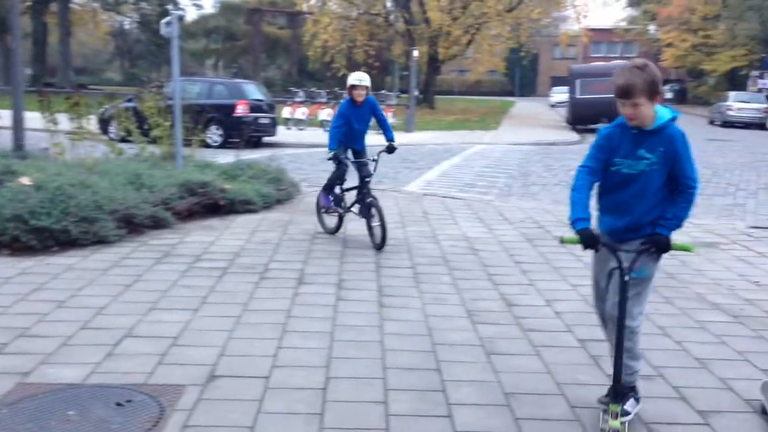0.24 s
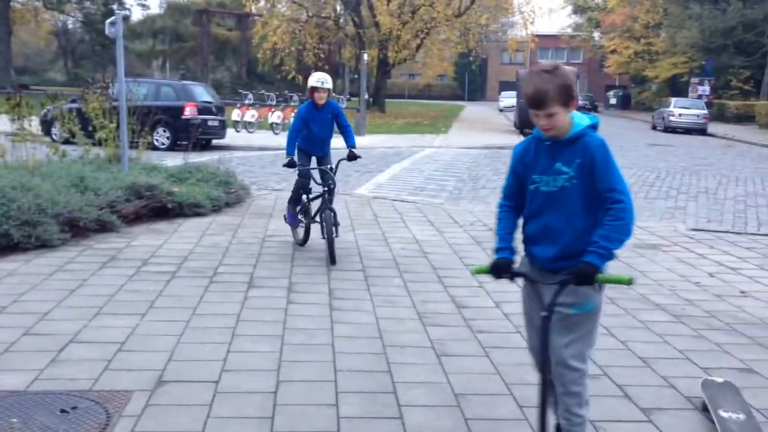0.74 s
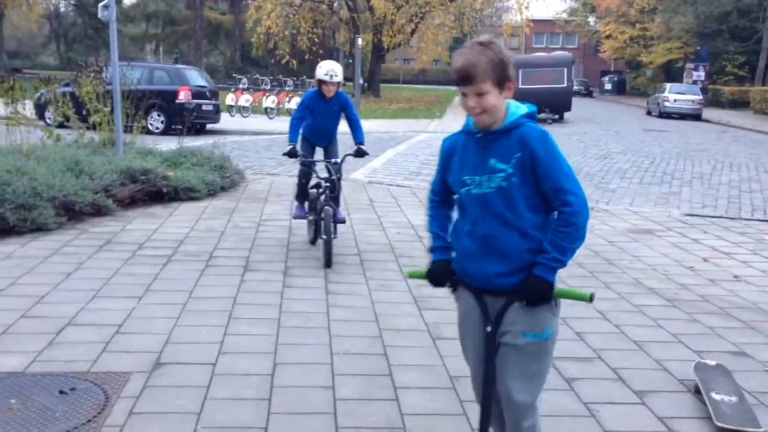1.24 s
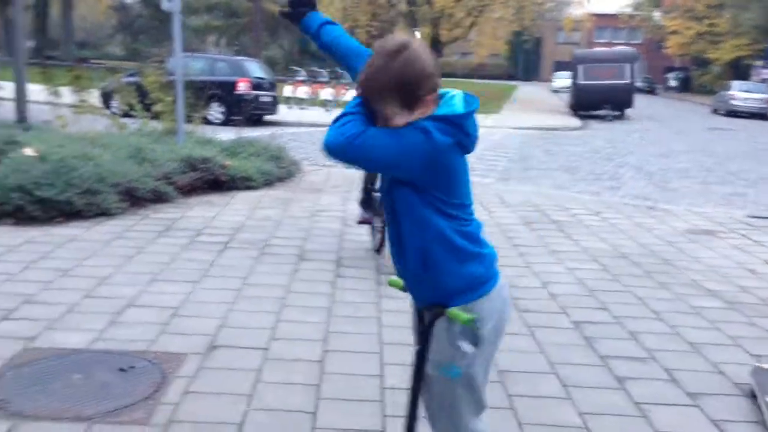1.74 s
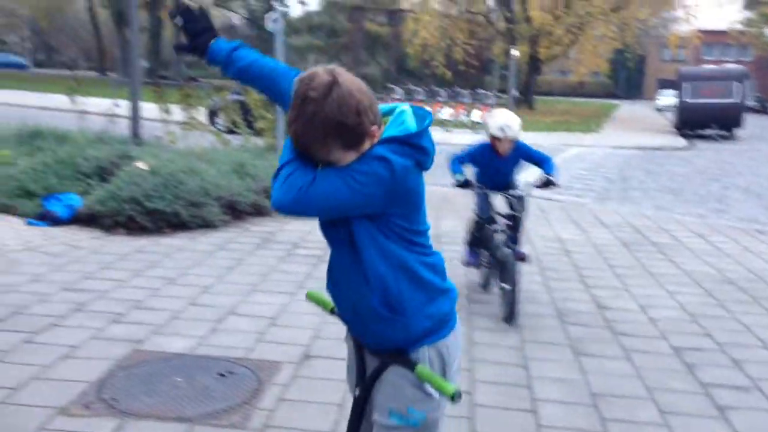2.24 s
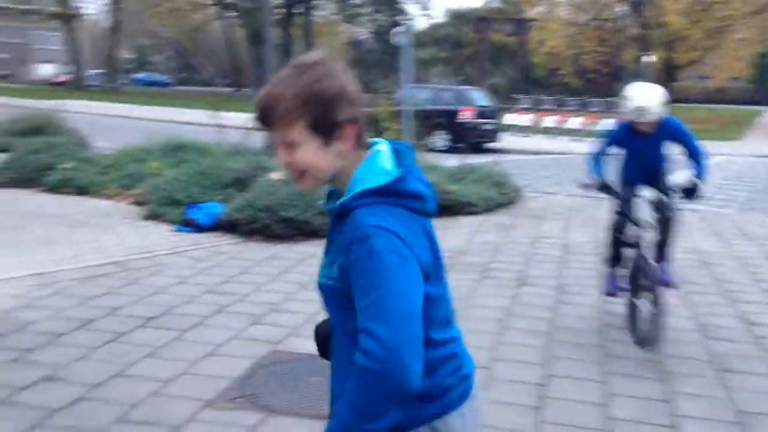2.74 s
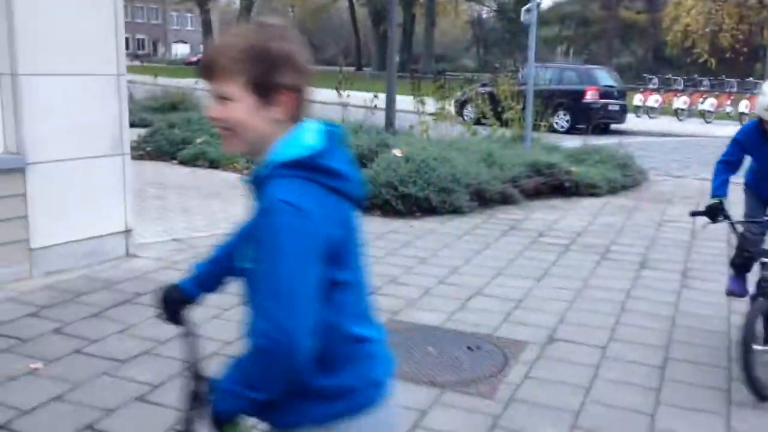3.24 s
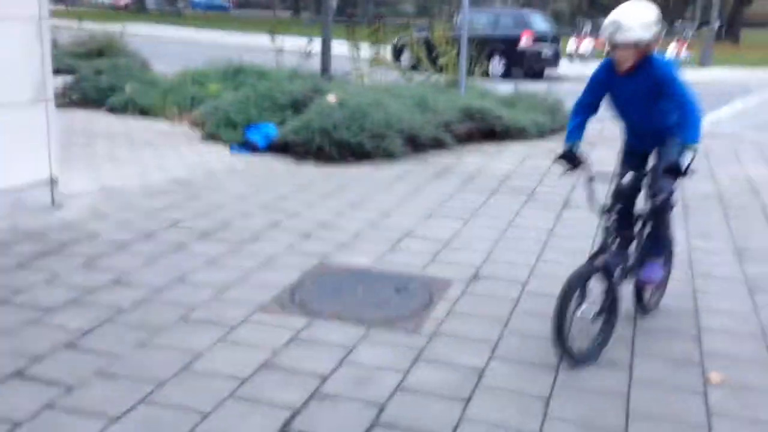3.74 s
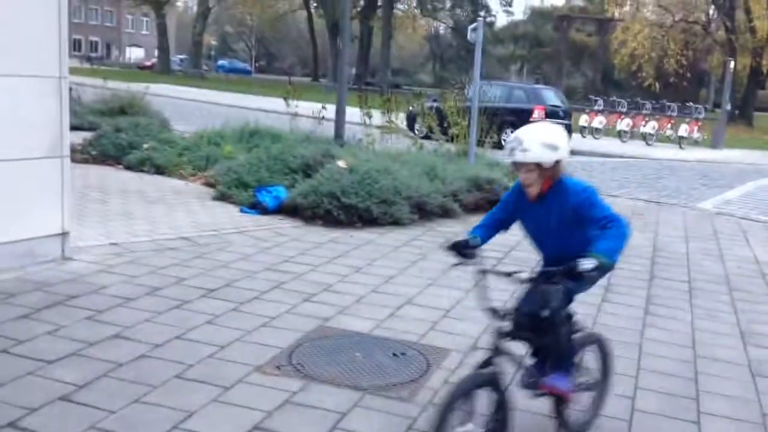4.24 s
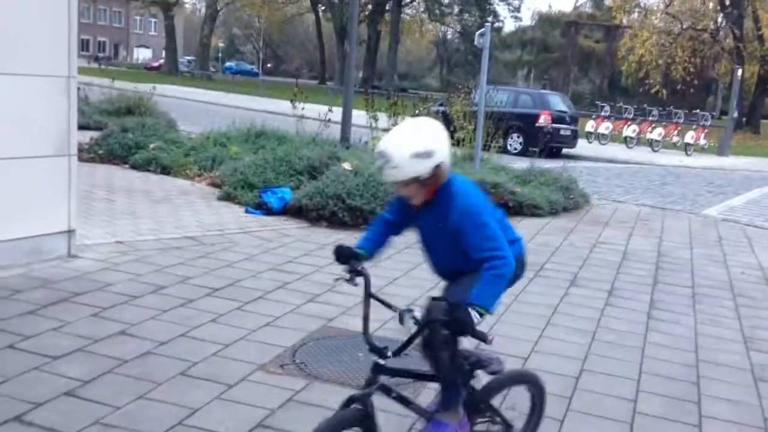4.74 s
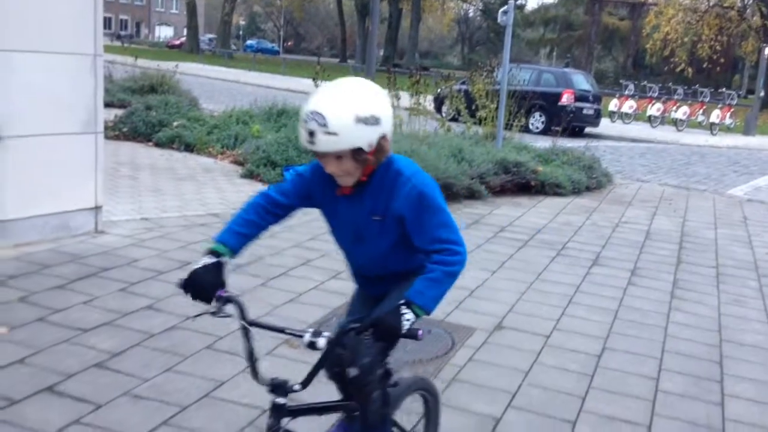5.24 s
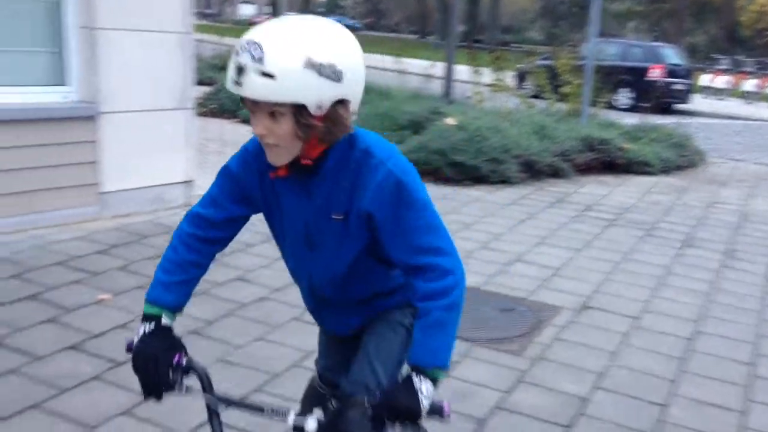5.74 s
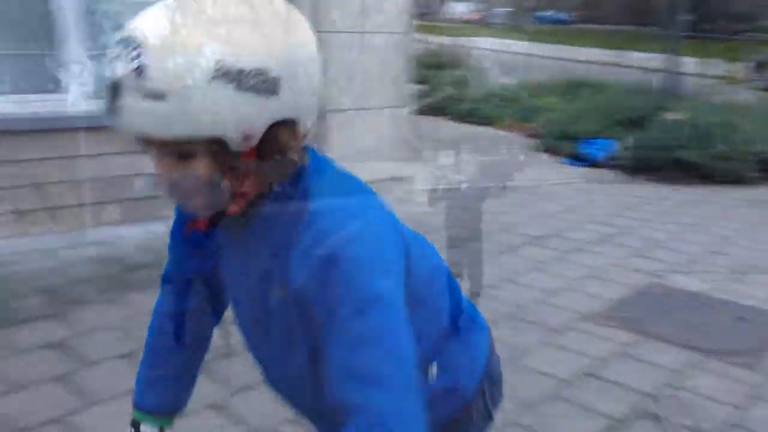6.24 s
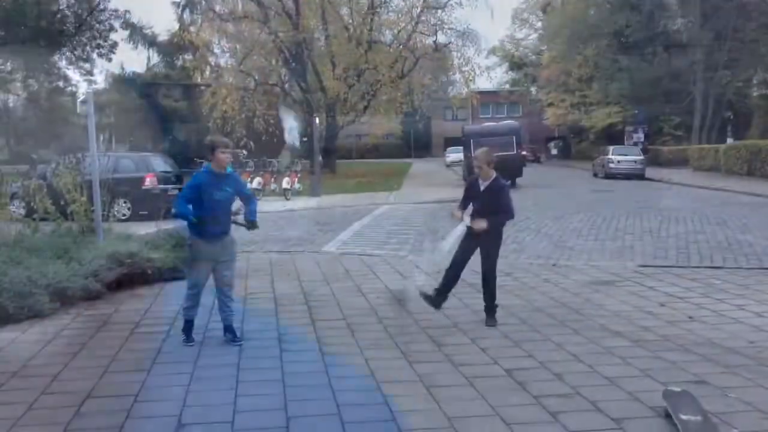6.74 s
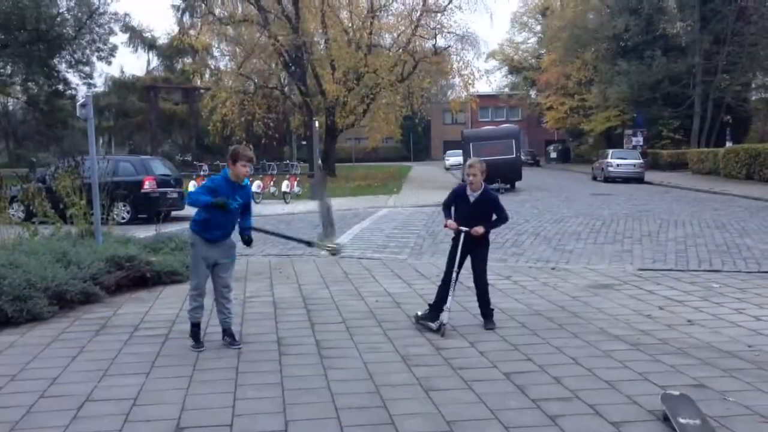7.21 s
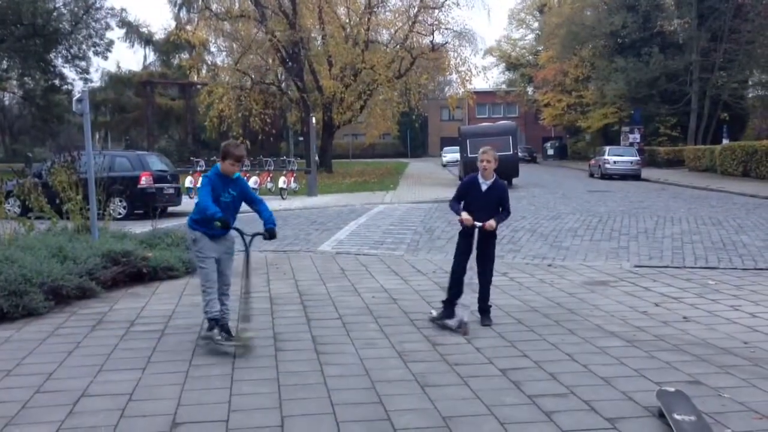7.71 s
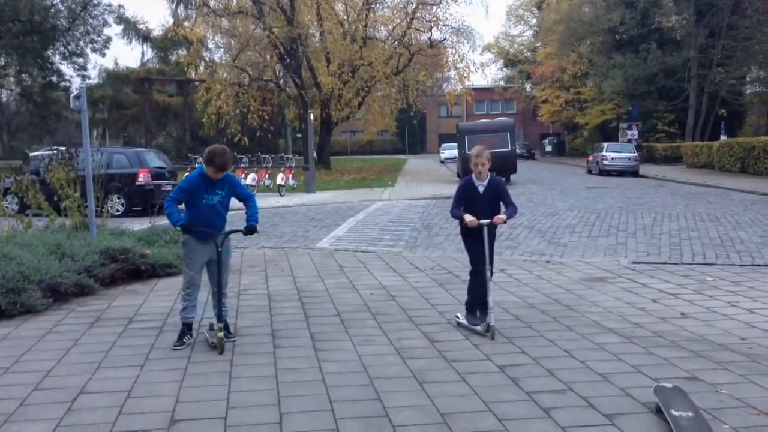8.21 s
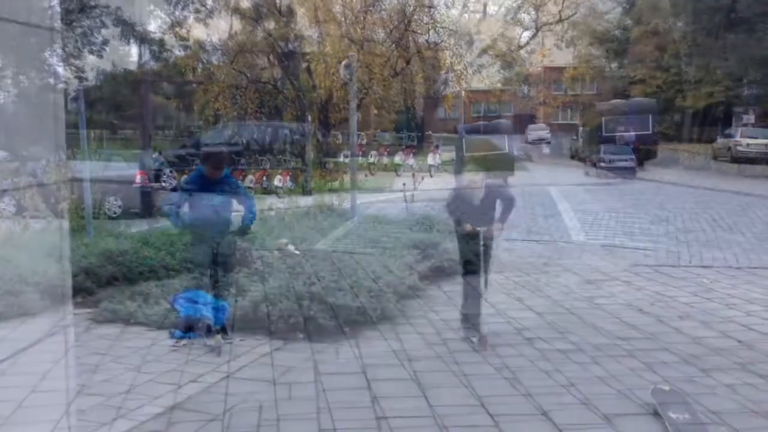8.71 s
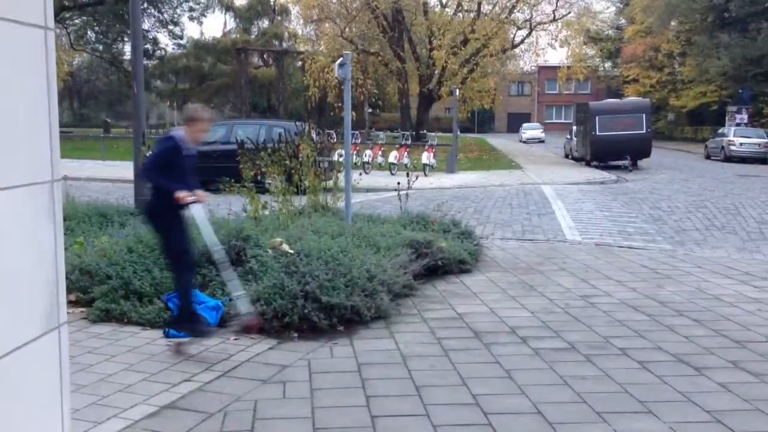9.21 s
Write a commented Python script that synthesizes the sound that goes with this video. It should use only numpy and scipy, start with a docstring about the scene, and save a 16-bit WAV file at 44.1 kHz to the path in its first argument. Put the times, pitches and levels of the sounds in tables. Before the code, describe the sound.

Kick scooters clatter and knock on paving stones, a bike freewheel ticks past, then a hard double crack and rattling wheels rolling up close.

```python
"""Kick scooters knock over the joints of a paved square: hard wheels and decks strike stone, loose metal rattles.
A blow and its chatter are bursts of noise that excite damped resonances of stone, deck and bar.
A freewheel clicks as its pawl snaps, tyres rumble past; shoes and rubber thump, scuff and squeak.
A low gliding hum is probably the engine of a passing car; distant traffic is shaped noise, and short
decaying echoes come from the house fronts. A phone a few metres away rounds peaks and cuts the top treble."""
import sys
import numpy as np
from scipy import signal
from scipy.io import wavfile
from scipy.ndimage import uniform_filter1d

SR = 44100
rng = np.random.default_rng(int(sys.argv[2]) if len(sys.argv) > 2 else 0)


def to_wav(sig):
    """Store sig (one row per channel, or 1-D mono) as 16-bit WAV at the path in sys.argv[1].

    Samples outside -1..1 are clipped; the rate is SR.
    """
    pcm = np.clip(np.atleast_2d(sig), -1, 1) * 32767
    pcm = np.round(pcm).astype(np.int16)
    wavfile.write(sys.argv[1], SR, pcm.T)  # frames by channels


N = 417627

# resonances of handlebar and fork: pitch_hz, width_hz, level_db
BAR_AND_FORK = [(4300, 200, -10), (5440, 110, 0), (6500, 80, -6), (9050, 120, -9), (10550, 200, -5),
                (12250, 120, -9), (13150, 150, -22), (14900, 150, -17)]


def undb(db):
    """Decibels to amplitude ratio: 20 dB is a factor of ten."""
    return 10 ** (np.asarray(db) / 20)


def unit(x):
    """Normalisation to a root-mean-square amplitude of 1."""
    return x / np.sqrt(np.mean(x ** 2))


def band(x, lo_hz, hi_hz, order=2):
    """Band-pass filtering: mainly the energy between two frequencies is kept."""
    return signal.sosfilt(signal.butter(order, [lo_hz, hi_hz], "bandpass", fs=SR, output="sos"), x)


def ring(x, modes):
    """Modal superposition; narrow modes are lifted so that white noise leaves each at the same power at 0 dB."""
    total = 0
    for hz, width_hz, db in modes:
        resonance = signal.lfilter(*signal.iirpeak(hz, hz / width_hz, SR), x)
        total = total + undb(db) * resonance / np.sqrt(width_hz / 1000)
    return total


def walk(rate_hz):
    """Random modulation: levels held for 1 / rate_hz and smoothed twice, with a spread near 1."""
    hold = int(SR / rate_hz)
    steps = np.repeat(rng.standard_normal(N // hold + 1), hold)
    smooth = uniform_filter1d(uniform_filter1d(steps, hold), hold)
    return 1.3 * smooth[:N]  # makes up for the spread lost in smoothing


def add(bus, s, sound):
    """Linear superposition: a sound joins the bus at s seconds."""
    i = int(s * SR)
    bus[..., i:i + sound.shape[-1]] += sound[..., :N - i]


def town():
    """Distant traffic as spectrally shaped noise: half-octave steps, each band flickering alone."""
    # traffic spectrum: pitch_hz, density_db (per hertz, relative)
    spectrum = [(15, -52), (25, -25.5), (48, 0.5), (215, -10.5), (313, -16.5), (895, -26), (2170, -16.5),
                (2700, -61.5), (15500, -47)]
    at_hz, density_db = np.transpose(spectrum)
    out = 0
    for hz in 30 * 2 ** np.arange(0, 9.1, .5):
        db = np.interp(np.log(hz), np.log(at_hz), density_db) + 0.68 * walk(13)
        out = out + undb(db) * band(rng.standard_normal(N), hz / 1.208, hz * 1.213)
    return unit(out) * undb(-50.5)


def hum():
    """Frequency modulation: a wavering low hum with its octave, probably the engine of a passing car."""
    # course of the lower tone: time_s, pitch_hz, level_db
    course = [(5.3, 64.7, -60), (5.602, 71.4, -31), (5.848, 71.5, -56), (6.136, 91.2, -43),
              (6.499, 87, -36.5), (6.742, 89.5, -36), (6.85, 78, -50)]
    t = np.arange(N) / SR
    s, hz, db = np.transpose(course)
    wavering_hz = np.interp(t, s, hz) * (1 + 0.0212 * walk(15))
    phase = 2 * np.pi * np.cumsum(wavering_hz) / SR
    fade = np.clip(np.minimum(t - s[0], s[-1] - t) / 0.15, 0, 1)
    tones = np.sin(phase) + undb(-19) * np.sin(2 * phase)
    return fade * undb(np.interp(t, s, db)) * tones


def rolling():
    """Roughness excitation: tyre cavities boom, treads roar on stone, grit crackles under hard wheels."""
    # levels of the rolling wheels: time_s, rumble_db, tread_db, grit_db
    roll_levels = [(0.0, -61, -58, -50), (0.31, -54, -54.5, -49), (0.58, -66, -54.5, -57.5),
                   (1.42, -59.5, -54, -60), (3.64, -46.5, -52.5, -51), (4.45, -46.5, -48.5, -50),
                   (5.27, -42, -44.5, -53.5), (5.85, -37, -45, -51), (6.2, -30.5, -38.5, -78),
                   (6.83, -40.5, -46.5, -76), (7.09, -45, -53, -44.5), (7.49, -50.5, -51.5, -62.5),
                   (7.89, -45.5, -47, -49), (8.09, -48, -51.5, -68.5), (8.57, -53.5, -55, -58),
                   (8.83, -56.5, -54, -49), (9.18, -42, -47, -34.5), (9.47, -44.5, -45, -38)]
    # resonances of the air in the tyres: pitch_hz, width_hz, level_db
    tyre_cavity = [(67.7, 46, -18), (89.3, 38, 4), (152.6, 9.2, -3), (206.6, 51, 4), (300.5, 32, -3)]
    s, *columns = np.transpose(roll_levels)
    rumble_db, tread_db, grit_db = (np.interp(np.arange(N) / SR, s, c) for c in columns)
    road = rng.standard_normal((3, N))
    rumble = unit(ring(road[0] * undb(1.5 * walk(25)), tyre_cavity))
    rough = road[1] * undb(1.5 * walk(30))
    tread = unit(band(rough, 572, 1564) + undb(-9.5) * ring(rough, [(1003, 160, 0.0082)]))
    crackle = road[2] * undb(2 * walk(200))
    grit = unit(band(crackle, 1800, 4500, order=1) + undb(-9) * ring(crackle, BAR_AND_FORK))
    return rumble * undb(rumble_db) + tread * undb(tread_db) + grit * undb(grit_db)


def scuffs():
    """Stick-slip friction: flickering grit noise through a doubled resonance, swelling and fading with the drag."""
    # soles and rubber dragged over stone: centre_s, length_s, level_db, pitch_hz, width_hz
    drags = [(.97, 0.16, -59, 3850, 600), (2.395, 0.13, -51.5, 3550, 6000),
             (2.97, 0.074, -43.5, 10100, 500), (3.247, 0.088, -37.5, 1940, 406),
             (4.835, 0.034, -22.5, 1960, 2550), (5.794, 0.2, -39.5, 2580, 3880),
             (7.39, 0.091, -48, 2318, 900), (6.895, 0.02, -29, 3020, 400)]
    t = np.arange(N) / SR
    grit = rng.standard_normal(N) * undb(3 * walk(200))
    out = 0
    for s, length_s, db, hz, width_hz in drags:
        mode = [(hz, width_hz, 0)]
        drag = ring(ring(grit, mode), mode)
        swell = np.exp(-(1.83 * (t - s) / length_s) ** 2)
        out = out + undb(db) * swell * unit(drag)
    return out


def squeaks():
    """Friction-driven oscillation: short gliding tones with an octave, broken up as the rubbing catches."""
    # thin squeaks: start_s, length_s, level_db, first_hz, last_hz
    glides = [(2.822, .055, -62, 4950, 4900), (3.049, 0.018, -44.5, 4670, 4600),
              (7.357, .028, -37, 2790, 1770)]
    out = np.zeros(N)
    for s, length_s, db, first_hz, last_hz in glides:
        x = np.linspace(0, 1, int(length_s * SR))
        phase = 2 * np.pi * np.cumsum(first_hz + (last_hz - first_hz) * x) / SR
        arch = np.sqrt(np.sin(np.pi * x).clip(0))
        add(out, s, undb(db) * arch * (np.sin(phase) + undb(-12) * np.sin(2 * phase)))
    return out * undb(4 * walk(250))


def thumps():
    """Damped oscillation: soft heavy contacts give a few decaying low cycles."""
    # feet and tyres landing: start_s, level_db, pitch_hz
    landings = [(1.016, -34, 530), (2.632, -18.5, 158), (2.88, -20, 146), (4.729, -19.5, 333),
                (5.963, -14, 153), (6.313, -19, 103.7), (6.5, -18, 198), (6.943, -13.5, 308),
                (7.839, -26.5, 315), (9.24, -21.5, 209)]
    out, t = np.zeros(N), np.arange(int(.1 * SR)) / SR
    for s, db, hz in landings:
        add(out, s, undb(db) * np.sin(2 * np.pi * hz * t) * np.exp(-t / 0.0047))
    return out


def freewheel():
    """Impulsive excitation: the pawl snaps over each tooth, a millisecond click that rings in the hub."""
    # spells of coasting, one list each: time_s, teeth_passed
    coasts = [
        [(1.06, 0), (1.128, 3), (1.17, 5), (1.4, 11), (1.505, 13), (1.617, 15), (1.762, 18), (1.86, 20)],
        [(2.274, 0), (2.342, 2), (2.415, 5)],
        [(3.914, 0), (4.016, 2), (4.106, 4)],
        [(4.469, 0), (4.524, 2), (4.602, 4), (4.665, 6), (4.726, 8)],
        [(5.206, 0), (5.326, 2), (5.373, 3), (5.475, 6), (5.602, 9), (5.7, 11), (5.818, 13), (5.978, 16),
         (6.083, 18), (6.17, 20), (6.244, 22), (6.345, 25), (6.422, 27), (6.513, 29), (6.618, 31), (6.712, 33),
         (6.791, 35), (6.868, 37)],
    ]
    # strength of the ticks: time_s, level_db
    tick_level = [(1.05, -50.5), (2.3, -48), (4.05, -60), (4.55, -42), (5.5, -42.5), (6.4, -39.5),
                  (6.87, -47)]
    # resonances of the hub: pitch_hz, width_hz, level_db
    hub = [(4700, 500, 0), (6200, 700, -3), (13500, 1500, -10)]
    snap_s, scatter_db = .0011, 2
    spells = []
    for s, teeth in map(np.transpose, coasts):
        spells.append(np.interp(np.arange(teeth[-1] + 1), teeth, s))
    times = np.concatenate(spells)
    force, t = np.zeros(N), np.arange(400) / SR
    chance = rng.standard_normal((len(times), 401))  # per tick: a level, then the grain of the click
    levels_db = np.interp(times, *np.transpose(tick_level)) + scatter_db * chance[:, 0]
    for s, db, grain in zip(times, levels_db, np.sign(chance[:, 1:])):
        add(force, s, undb(db) * grain * np.exp(-t / snap_s))
    snap = band(force, 3500, 18000)
    return undb(-1) * snap + undb(12) * ring(snap, hub)


def knocks():
    """Impact and modal response: a blow, then settling chatter, crack on stone and ring deck and metal."""
    # knocks on the stones: start_s, level_db, then thud_db, deck_db, metal_db relative to it, rattle_t60_s
    strikes = [(0.0481, -31, -7, 3, -0.5, 0.033), (0.1361, -25.5, -2, 0, -4, 0.05),
               (0.168, -8.5, -20, -13.5, -4, 0.044), (0.196, -19, -11, -16, 0.5, 0.1),
               (0.254, -18.5, -27, -18, 2, 0.11), (0.2788, -16, -10, -16, -14, 0.1),
               (0.2914, -32, -26, -7, -4, 0.13), (0.3205, -28, -18, -6, 0, 0.043),
               (0.424, -26, -23, -9, 5, 0.078), (0.475, -27, -16, -6.5, -4, 0.1),
               (0.55, -37.5, -3, -12, -1, 0.073), (0.609, -32.5, -12, -8, -5, 0.075),
               (0.691, -38, -11, -24, 5.5, 0.039), (0.8081, -35.5, -3, -7.5, -4, 0.07),
               (1.128, -24.5, -18, -9, 1, 0.039), (1.6826, -28.5, -3, -8, 5.5, 0.096),
               (1.9487, -29, -12, -11, -6, 0.19), (1.985, -29.5, -19, -22, 2.5, 0.14),
               (2.016, -31.5, -16, -13, 4, 0.18), (2.0526, -30.5, -14, -10, 5, 0.057),
               (2.598, -36, 12.5, 2, -3, 0.14), (2.643, -41, 0, -7, 0, 0.1),
               (2.6698, -33, 17, -4, -6, 0.065), (2.7267, -37.5, -7, -5, -1, 0.22),
               (2.7897, -34, 14.5, -7, -8, 0.056), (2.8772, -22.5, 3, -11, -8, 0.12),
               (2.9055, -13.5, -5, -12.5, -5.5, 0.033), (2.9188, -26.5, -8, -1, -6, 0.078),
               (2.9512, -23.5, -15, -20, -10, 0.11), (2.993, -39, -9, -1, -10, 0.043),
               (3.5964, -31, -19, -11, 5, 0.086), (3.6662, -20.5, 0.5, -2, 2, 0.23),
               (3.7028, -19.5, 0, -2.5, -4.5, 0.28), (3.7502, -26, 5, -3, 3, 0.089),
               (4.152, -19, -6, -9, 1, 0.26), (4.1797, -26.5, -23, -10, 0, 0.13),
               (4.2429, -22.5, 13.5, 1.5, -7, 0.17), (4.3084, -24, 4.5, -3, 1, 0.3),
               (4.725, -30, 2, -8, -10, 0.3), (4.7533, -13, 0, -11, -9, 0.045),
               (4.765, -11.5, 3, -5.5, -3, 0.11), (4.8146, -14, -6.5, -12, -4.5, 0.29),
               (4.9398, -29.5, -1, 1.5, -5, 0.11), (5.0779, -36, -7, 2.5, -9, 0.036),
               (5.4061, -17, -10, -13.5, 0, 0.087), (5.4738, -9.5, -4, -22, -12, 0.098),
               (5.5384, -28, -19, -6, -6, 0.084), (5.8514, -32.5, -23, -8, -2, 0.14),
               (5.9267, -34.5, 8, 0, -3, 0.14), (6.1005, -32.5, -4, 6, -2, 0.13),
               (6.6496, -22, -9, -6.5, -18, 0.06), (6.8946, 2, -0.5, -7, -2.5, 0.096),
               (6.9203, -11.5, -8, -4, -7, 0.3), (6.9468, -1, -1.5, -7.5, -5.5, 0.11),
               (6.966, -11, -5, -6, -3, 0.11), (7.028, -14.5, -2.5, -7, 2, 0.18),
               (7.0604, -8.5, -4, -2, -3.5, 0.089), (7.0791, -21.5, -15, -3, -6, 0.035),
               (7.188, -27.5, -14, -16, 3, 0.12), (7.676, -28, -11, -11, -2, 0.2),
               (7.709, -22, -10, -9, 1, 0.087), (7.8067, -31, -6, -13, 1, 0.2),
               (7.837, -34.5, 10, -3, -7, 0.089), (7.9926, -38, -15, -3, -1, 0.24),
               (8.3432, -35, 8, 8.5, -7, 0.076), (8.528, -39, -7, -17, -3, 0.1),
               (8.5964, -42.5, -8, -7, -7, 0.21), (8.6674, -34.5, -8, -9, -3, 0.12),
               (8.74, -37, 1, -1.5, -2, 0.15), (8.8102, -27.5, -3.5, -1.5, 0, 0.11),
               (8.8854, -26.5, -4, 1.5, -2, 0.086), (8.953, -20.5, -6.5, -4, -1.5, 0.12),
               (9.0146, -28, -15, 5, -5, 0.11), (9.0748, -19.5, -2.5, -0.5, 2.5, 0.13),
               (9.134, -25.5, -25, 4.5, -1, 0.059), (9.1845, -11.5, -8, -1, 5, 0.1),
               (9.2436, -0.5, -10, -6, -6, 0.062), (9.284, -11, -20, -18, -6, 0.12),
               (9.3003, -2.5, -12, -4.5, -4.5, 0.071), (9.368, -6, -19, -11.5, -1, 0.11),
               (9.4462, -5, -13, -9, -1, 0.064)]
    # deck of the near scooter, then of the one that rolls up last: pitch_hz, width_hz, level_db
    decks = [
        [(1780, 60, -3), (2200, 200, -4), (2400, 80, -5), (2520, 100, 0), (3170, 100, -8)],
        [(2410, 200, -3), (3010, 100, 0)],
    ]
    # hollow note of the stone: pitch_hz, width_hz, level_db
    stone = [(1066, 620, -2)]
    blow_s, rise_s = .003, .0017  # the loose parts start to chatter just after the blow
    treble_db = -14.5  # drive of the treble relative to that of the crack
    second_scooter_s = 8.4
    t = np.arange(int(.3 * SR)) / SR
    grain = rng.standard_normal((5, N))  # rows: thud, deck, crack, treble, metal
    chatter = undb(3.8 * walk(450))
    blow, settle = np.zeros((5, N)), np.zeros((5, N))
    for s, db, thud_db, deck_db, metal_db, t60_s in strikes:
        shares = undb(db + np.array([thud_db, deck_db, 0, treble_db, metal_db]))[:, None]
        add(blow, s, shares * np.exp(-t / blow_s))
        decay = np.exp(-np.log(1000) * (t / t60_s) ** 1.1)  # holds on a little, then dies faster
        add(settle, s, shares * (1 - np.exp(-t / rise_s)) * decay)
    force = undb(-0.5) * (undb(2) * np.sign(grain) * blow + grain * chatter * settle)
    edges_hz = [(750, 1900), (1900, 3500), (3500, 7000), (7500, 14000)]
    crack = [band(row, *edge) for row, edge in zip(force, edges_hz)]
    second = np.arange(N) > second_scooter_s * SR
    deck = ring(crack[1] * ~second, decks[0]) + undb(0.5) * ring(crack[1] * second, decks[1])
    metal = undb(-3) * ring(force[4], BAR_AND_FORK)
    hollow = undb(-10) * ring(crack[0], stone)
    return undb(-6) * sum(crack) + deck + metal + hollow


def scene():
    """Superposition of near sources, their diffuse reflections and the background."""
    near = knocks() + freewheel() + thumps() + scuffs() + squeaks()
    echo_t60_s, echo_db, first_return_s = 0.17, -15.5, .012
    t = np.arange(int(.7 * SR)) / SR
    # scattered returns from the house fronts arrive late and duller
    fronts = band(rng.standard_normal(len(t)), 300, 5900, order=1)
    fronts = fronts * np.exp(-np.log(1000) * t / echo_t60_s) * (t > first_return_s)
    echo = signal.fftconvolve(near, fronts / np.linalg.norm(fronts))[:N]
    return (near + undb(echo_db) * echo + rolling() + hum() + town())[None]


def record(dry):
    """Band limiting and saturation: the phone drops deep bass, rounds peaks and cuts treble in two steep steps."""
    limit, mic_top_hz, top_hz = .72, 15200, 16450
    bass_cut = signal.sosfilt(signal.butter(2, 45, "highpass", fs=SR, output="sos"), dry)
    rounded = limit * np.tanh(bass_cut / limit)
    shelf = signal.sosfilt(signal.ellip(6, .2, 36, mic_top_hz, fs=SR, output="sos"), rounded)
    return signal.sosfilt(signal.ellip(10, .2, 80, top_hz, fs=SR, output="sos"), shelf)


dry = scene()
out = record(dry)
to_wav(out)
```